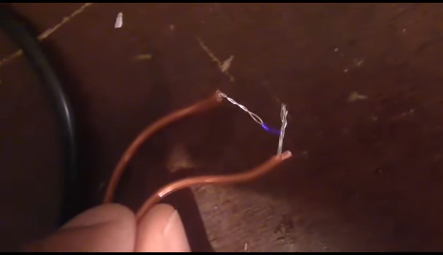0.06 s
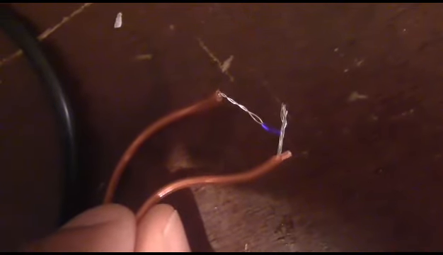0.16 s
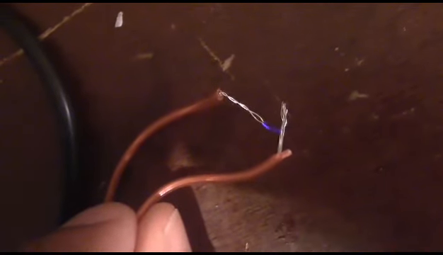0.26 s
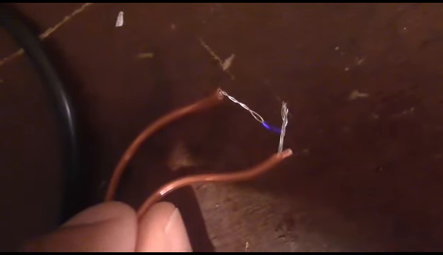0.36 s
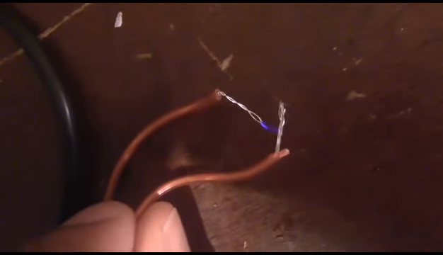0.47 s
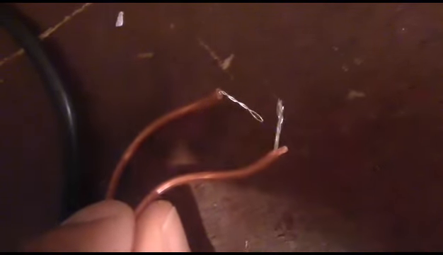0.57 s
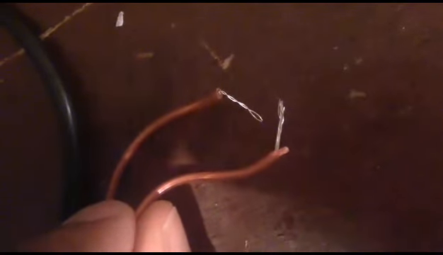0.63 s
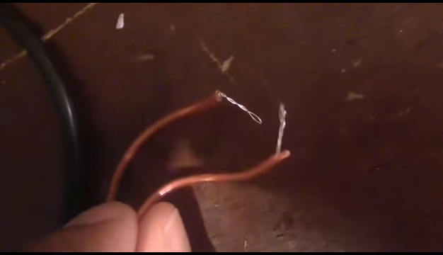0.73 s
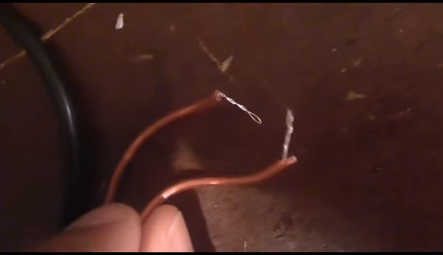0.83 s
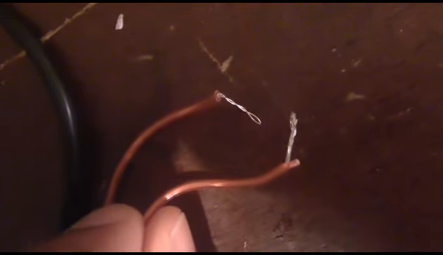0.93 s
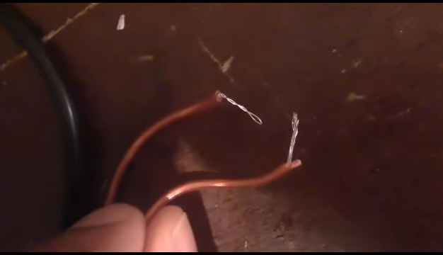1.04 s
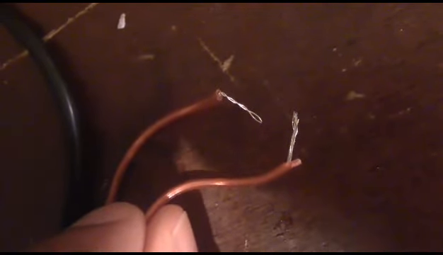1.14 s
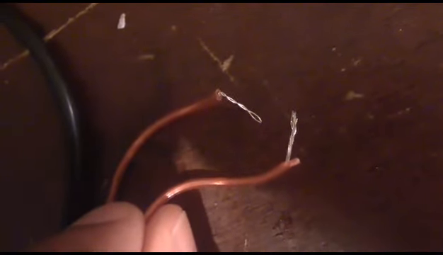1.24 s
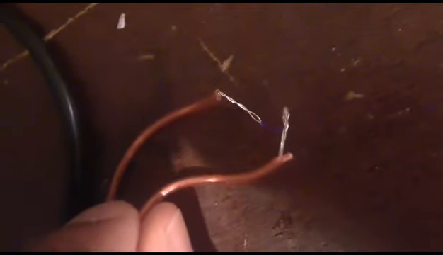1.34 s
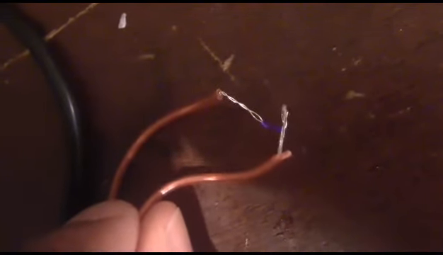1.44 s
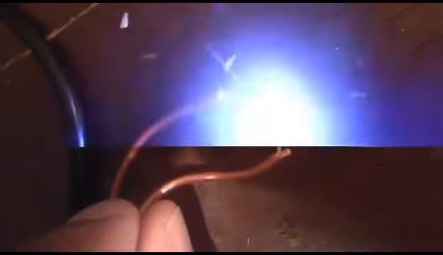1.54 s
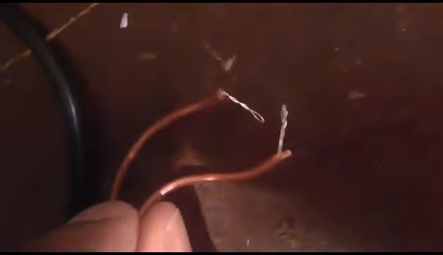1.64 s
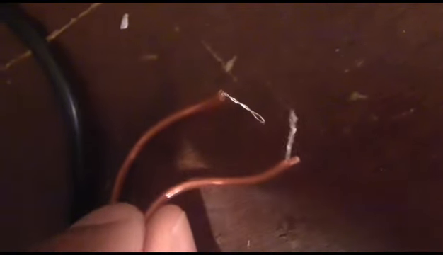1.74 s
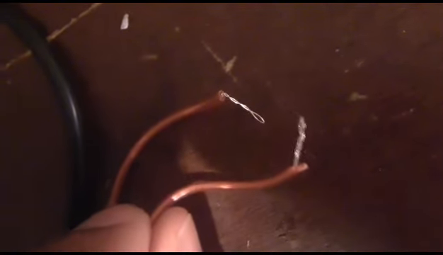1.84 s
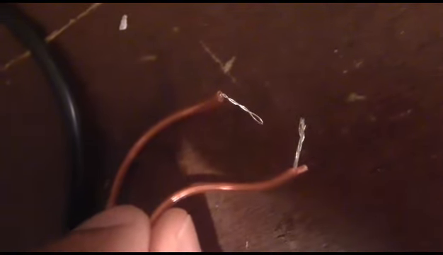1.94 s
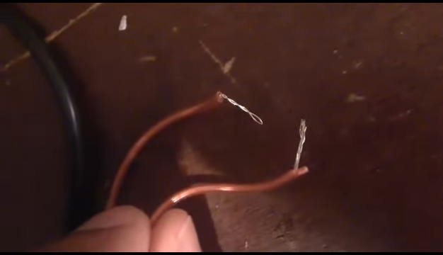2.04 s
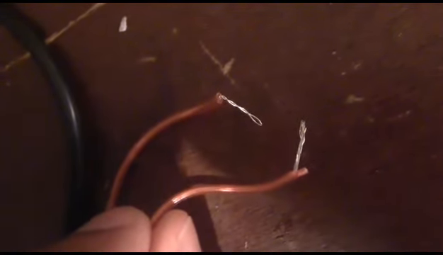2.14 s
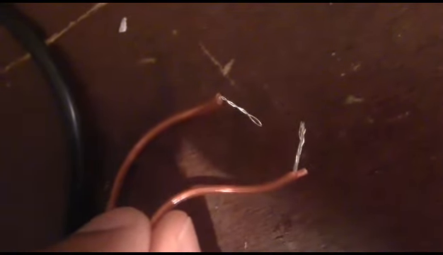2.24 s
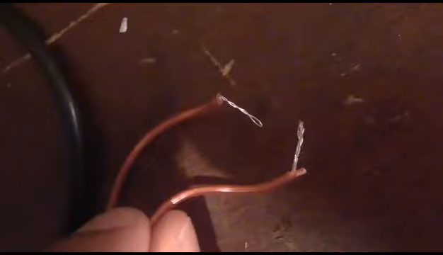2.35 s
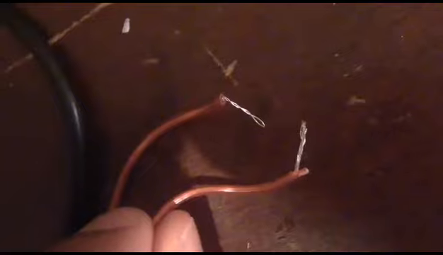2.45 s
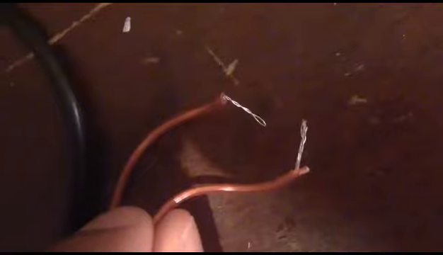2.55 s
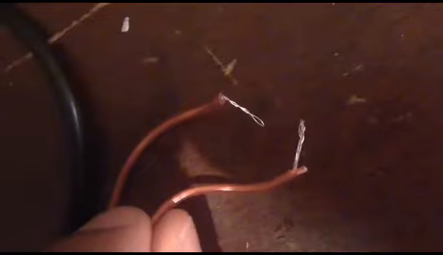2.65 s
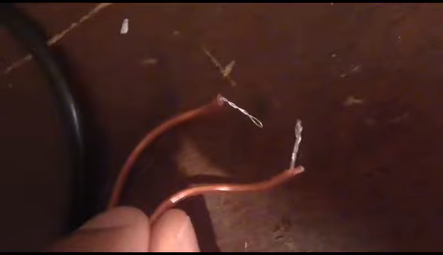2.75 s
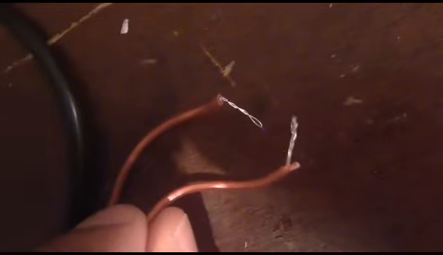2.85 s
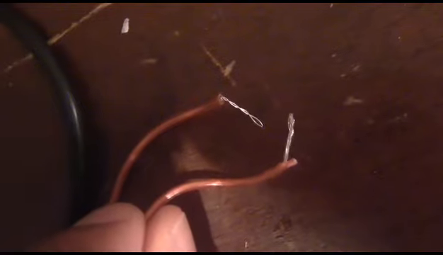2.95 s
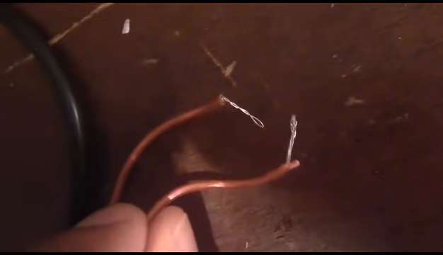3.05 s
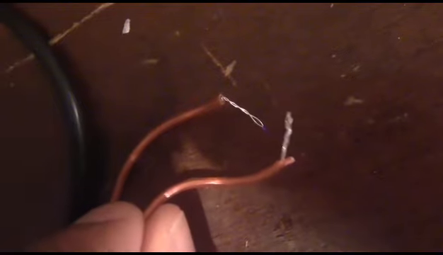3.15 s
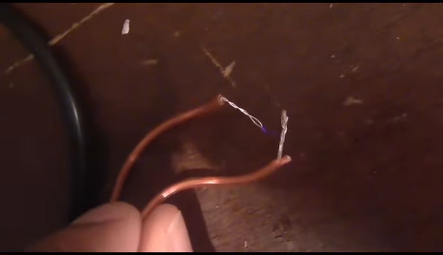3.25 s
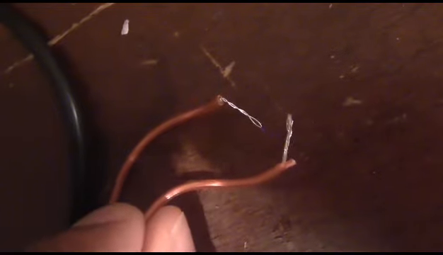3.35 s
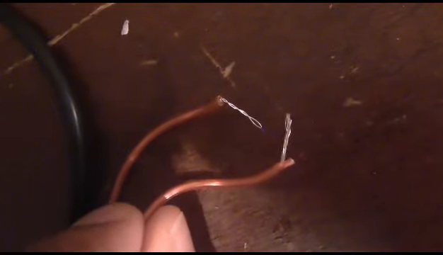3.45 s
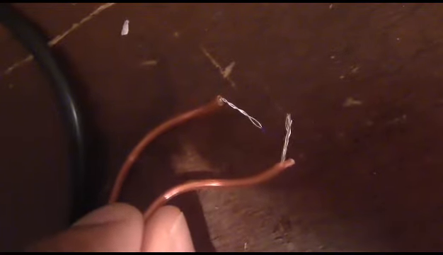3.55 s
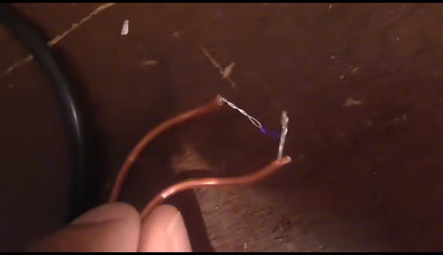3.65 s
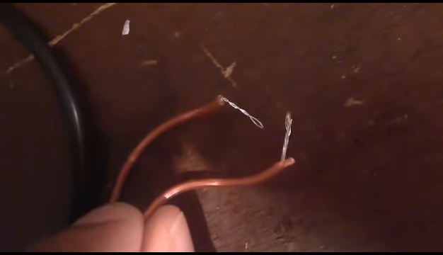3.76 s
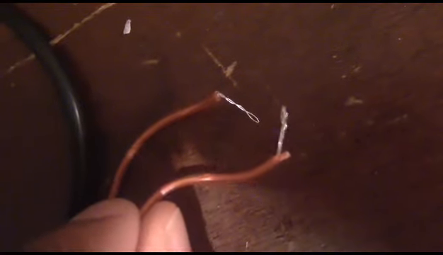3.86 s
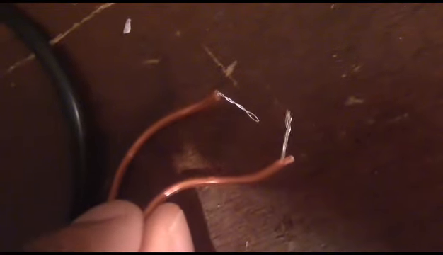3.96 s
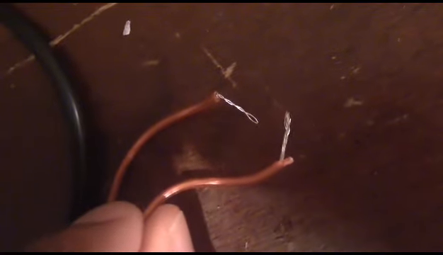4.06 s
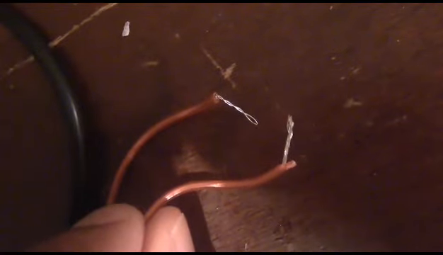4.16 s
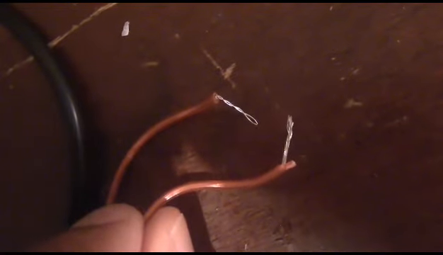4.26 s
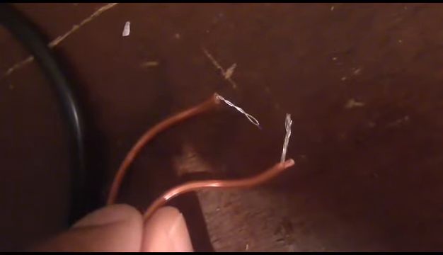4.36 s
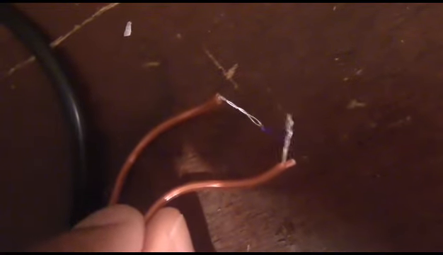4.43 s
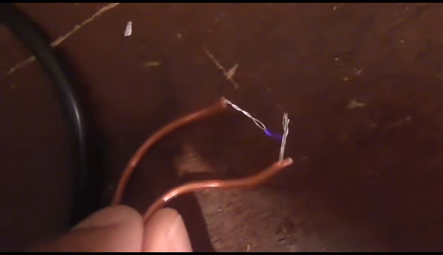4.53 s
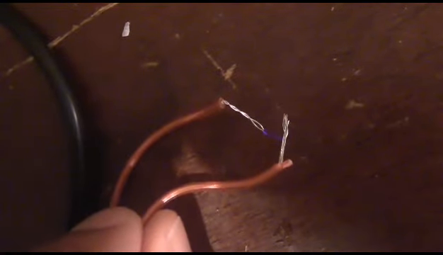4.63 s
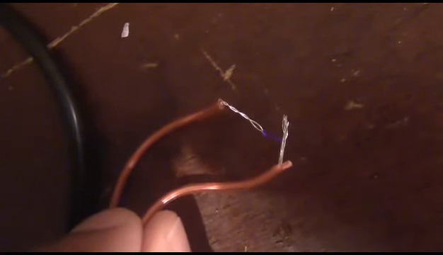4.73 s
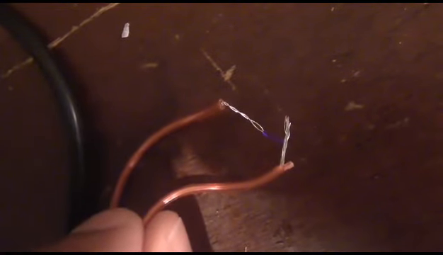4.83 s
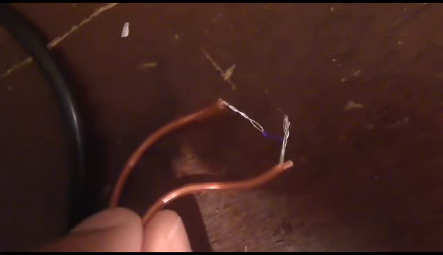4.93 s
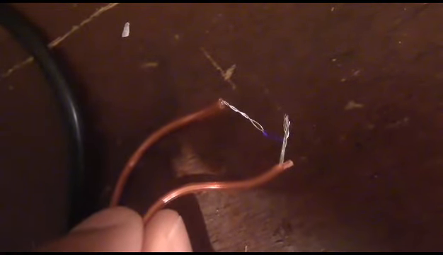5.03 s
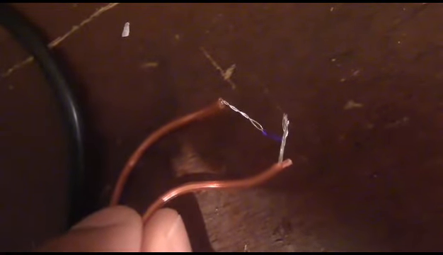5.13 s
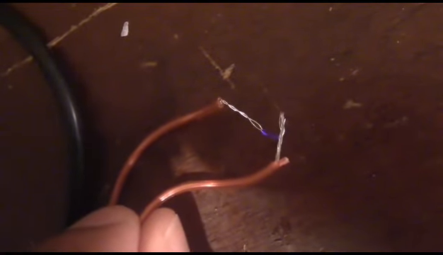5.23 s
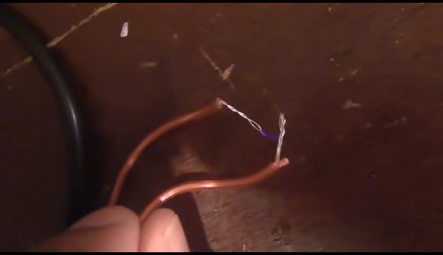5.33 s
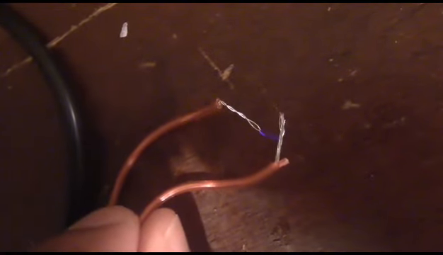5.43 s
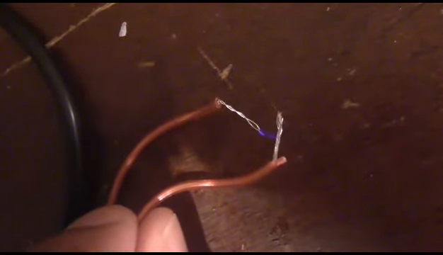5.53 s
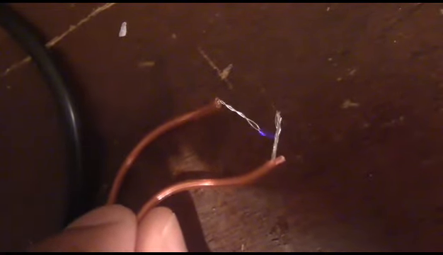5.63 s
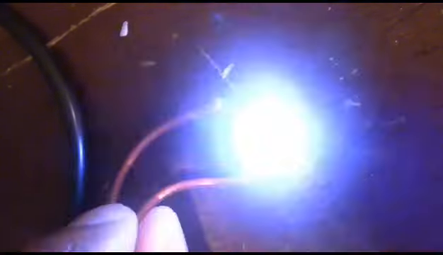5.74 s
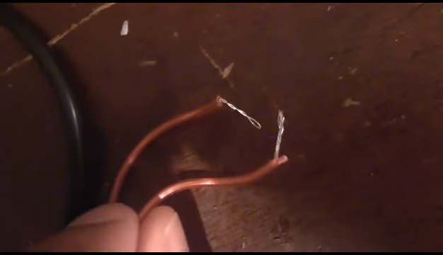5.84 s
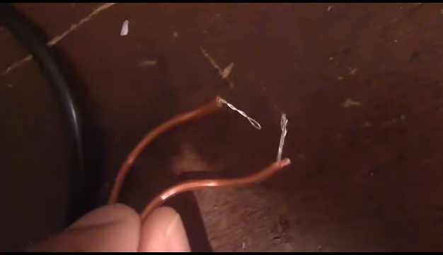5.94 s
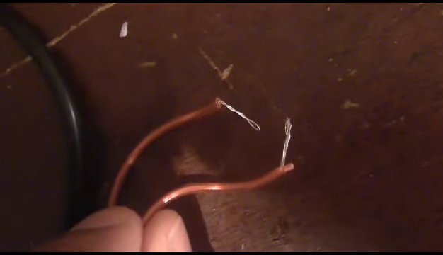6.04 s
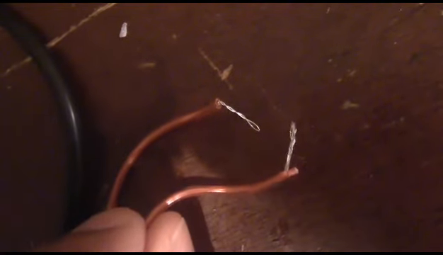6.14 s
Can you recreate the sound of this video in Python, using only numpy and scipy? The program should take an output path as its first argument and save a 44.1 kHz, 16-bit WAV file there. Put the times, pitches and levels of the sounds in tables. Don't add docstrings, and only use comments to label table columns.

```python
import sys
import numpy as np
from scipy import signal
from scipy.fft import rfft, irfft
from scipy.io import wavfile
from scipy.ndimage import uniform_filter1d

SR = 44100
rng = np.random.default_rng(int(sys.argv[2]) if len(sys.argv) > 2 else 0)


def store_wav(level_fs):
    pcm = np.round(np.clip(np.atleast_2d(level_fs), -1, 1) * 32767)
    wavfile.write(sys.argv[1], SR, pcm.T.astype(np.int16))


def attenuation_scalar(level_db):
    decades = np.asarray(level_db, float) / 20
    return 10 ** decades


N = 272979
ROOM_T60_S = 0.27


def rms_one(x):
    return x / np.sqrt(np.mean(x ** 2) + 1e-20)


def in_time(rows, outside=None):
    s, *columns = np.transpose(rows)
    t = np.arange(N) / SR
    return [np.interp(t, s, column, left=outside, right=outside) for column in columns]


def filtered(x, hz, kind, order=2):
    return signal.sosfilt(signal.butter(order, hz, kind, fs=SR, output="sos"), x)


def colour(x, spectrum):
    hz, level_db = np.transpose(spectrum)
    grid = np.maximum(np.arange(2049) * SR / 4096, 1)
    log_gain = np.interp(np.log(grid), np.log(hz), level_db) * np.log(10) / 20
    cepstrum = irfft(log_gain)
    cepstrum[1:2048] *= 2
    cepstrum[2049:] = 0
    kernel = irfft(np.exp(rfft(cepstrum)))[:2048]
    return signal.oaconvolve(x, kernel / np.sqrt(np.sum(kernel ** 2)))[:len(x)]


def drift(rate_hz):
    r = np.exp(-2 * np.pi * rate_hz / SR)
    settle = 20000
    noise = rng.standard_normal(N + settle)
    return rms_one(signal.lfilter([1], [1, -2 * r, r * r], noise)[settle:])


# t/s, f/Hz, level/dB
WHINE = [(0, 9850, -53), (.7, 9880, -48.5), (.8, 9804, -62), (1.2, 9770, -67), (1.45, 9790, -63),
         (1.7, 9803, -72), (1.8, 9854, -76), (1.93, 9860, -73.5), (2.1, 9720, -71.5), (2.4, 9760, -66),
         (3.8, 9770, -68), (4.05, 9810, -67.5), (4.3, 9770, -67), (5.9, 9850, -63), (6.05, 9730, -68),
         (6.19, 9780, -67.5)]


def oscillator():
    hz, level_db = in_time(WHINE)
    turns = np.cumsum(hz + 25.0 * drift(21) + 45.0 * drift(300)) / SR
    whine = attenuation_scalar(level_db + 1.2 * drift(40)) * np.sqrt(2) * np.sin(2 * np.pi * turns)
    return turns, whine


# t/s, level/dB, share of time lit [0-1], share of cycles that fire [0-1]
ARC = [
    [(0.0, -39.5, 1, 0.33), (0.654, -39, 1, 0.37), (0.705, -35.5, 0.8, 0.5)],
    [(1.495, -49, 0.8, 0.1), (1.535, -43, 0.7, .2), (1.579, -43, 0.8, 0.14), (1.597, -48.5, 0.56, 0.09),
     (1.623, -39, 0.94, 0.18), (1.695, -44.5, 0.94, 0.24), (1.737, -37.5, 1, 0.4)],
    [(4.657, -40, 0.85, 0.35), (4.831, -44.5, 0.86, 0.18), (5.249, -44, 0.96, 0.31),
     (5.397, -41.5, 0.99, 0.28), (5.501, -44, 0.86, 0.32), (5.555, -41.5, 0.96, 0.23),
     (5.643, -43.5, 0.91, 0.23), (5.845, -40, 0.94, 0.25), (5.918, -41.5, 0.84, 0.36)],
]


def steady_arc(luck, flicker, eager):
    clicks = np.zeros(N)
    for rows in ARC:
        last_s, *last = rows[-1]
        held = rows + [(last_s + .0105, *last)]
        level_db, lit, fire = in_time(held, outside=1e-9)
        fire, lit = np.clip(fire, 1e-9, 1), np.clip(lit, 1e-9, 1)
        fires = (flicker < lit) * (luck < fire * eager)
        clicks += fires * attenuation_scalar(level_db + 6.0) / np.sqrt(fire * lit)
    return clicks


# f/Hz, density/dB per Hz
SPARK = [(300, -24.5), (1050, -14), (1500, -15), (2200, -12), (3900, -6), (5100, -10.5), (6000, -5.5),
         (6500, -9), (7200, -7), (9700, -3), (11700, -1.5), (14200, -11.5), (14900, -22.5), (15700, -21),
         (15850, -66)]


def sparks(turns):
    cycle = np.diff(np.floor(turns), prepend=0) > 0
    luck, size = rng.random(N), attenuation_scalar(1.0 * rng.standard_normal(N))
    flicker = np.argsort(np.argsort(drift(330) + 0.35 * drift(52))) / N
    eager = attenuation_scalar(3.0 * drift(500))
    caught, weak = bursts(cycle, luck, flicker, eager)
    fired = (steady_arc(luck, flicker, eager) + caught) * cycle * size

    lag = 8 + 0.51 * rng.standard_normal(N) + 1.6 * drift(350)
    at = np.arange(N) + np.abs(np.rint(lag)).astype(int)
    clicks = np.bincount(at, fired)[:N]
    clicks += np.bincount(at + 2, fired * weak)[:N]
    direct = filtered(colour(clicks, SPARK), 180, "high")

    t = np.arange(SR // 4) / SR
    walls = rng.standard_normal(len(t)) * attenuation_scalar(-54.5 - 60 * t / ROOM_T60_S) * (t > .0015)
    table_and_hand = rng.standard_normal(len(t)) * attenuation_scalar(-30.0 - 60 * t / 0.01) * (t > .0002)
    return direct + signal.oaconvolve(direct, walls + table_and_hand)[:N]


# t/s, level/dB
GAIN = [(0, -65), (.71, -60.5), (1.4, -65), (1.72, -82.5), (1.93, -82.5), (2.17, -74), (3.24, -72),
        (4.19, -69.5), (5.34, -68.5), (5.9, -65.5), (6.19, -66)]
# f/Hz, density/dB per Hz
FLOOR = [(25, -50.5), (60, -29), (170, -13.5), (310, -3), (450, -6), (800, -10), (1500, -13), (4000, -40.5)]
# f/Hz, density/dB per Hz
HISS = [(200, -10.5), (800, -3), (2000, 1), (4500, 1), (6500, -5.5), (8000, -7), (10000, -5.5),
        (12000, -11.5), (14200, -15.5), (14900, -18), (15700, -22), (15850, -54.5)]


def background():
    gain_db, = in_time(GAIN)
    glow = sum(attenuation_scalar(in_time(rows, outside=-200)[0] - 18) for rows in ARC)
    glow = uniform_filter1d(glow, size=1500)
    knee_db, follows = -71, 0.54
    hiss = attenuation_scalar(-69.5 + follows * np.minimum(gain_db - knee_db, 0))
    out = attenuation_scalar(gain_db) * colour(rng.standard_normal(N), FLOOR)
    out += hiss * colour(rng.standard_normal(N), HISS)
    return out + glow * colour(rng.standard_normal(N), SPARK)


# t/s, level/dB
RUMBLE = [(0, -68), (1.3, -67.5), (1.5, -95), (4.5, -90.5), (6.19, -76.5)]


def hand_rumble():
    low = rms_one(filtered(rng.standard_normal(N), [110, 500], "band"))
    return low * attenuation_scalar(in_time(RUMBLE)[0] + 2.0 * drift(8))


# f/Hz, level/dB, t60/s
KNOCK = [(416, -27.5, 0.022), (1340, -28, 0.024), (1564, -7, 0.0055), (2730, -17.5, 0.0054),
         (4200, -17.5, 0.0046)]


def table_knock():
    after = np.maximum(np.arange(N) / SR - .4128, 0)
    attack = 1 - np.exp(-after / 0.00094)
    return attack * sum(attenuation_scalar(db - 60 * after / t60) * np.sin(2 * np.pi * hz * after) for hz, db, t60 in KNOCK)


# f/Hz, density/dB per Hz
CRACK = [(710, -58), (1200, -16.5), (3320, -4.5), (3870, -3.5), (7740, -3), (9210, -2.5), (14200, -3.5),
         (16000, -7.5)]
# delay/ms, level/dB, smear/ms
ECHOES = [(2.28, -20.5, 1.2), (6.937, -17, 0.54), (8.12, -15, 1.7), (13.51, -7, .16), (13.53, -18.5, 0.552),
          (18.4, -16, 1), (22.2, -18, 0.36), (29.9, -21.5, 0.907), (60.8, -19, 1.32)]
# f/Hz, density/dB per Hz
TAIL = [(180, -58), (300, -27.5), (555, -13), (915, -11), (1170, -4), (1460, -10.5), (1780, -6), (4520, -6),
        (7570, -3), (12700, -5.5), (16000, -15)]


def snap_room(t):
    room = colour(rng.standard_normal(len(t)), TAIL) * attenuation_scalar(-16.5 - 60 * t / ROOM_T60_S) * (t > .004)
    treble = filtered(room, 9000, "high")
    room -= treble * (1 - attenuation_scalar(-60 * t / .5))
    room *= attenuation_scalar(-19 * np.exp(-(t / 0.029) ** 2.63))
    grain = rng.standard_normal(len(t))
    echoes = np.zeros(len(t))
    for ms, db, smear_ms in ECHOES:
        echoes += attenuation_scalar(db) * grain * (t > ms / 1000) * np.exp(-np.abs(t * 1000 - ms) / smear_ms)
    return room + colour(echoes, CRACK)


def input_swing(t, suction, suction_ms, push, push_ms, recovery_hz):
    ms, w = t * 1000, 2 * np.pi * recovery_hz
    step = push * ((ms > suction_ms) & (ms < suction_ms + push_ms)) - suction * (ms < suction_ms)
    step = signal.lfilter(*signal.butter(1, 300, fs=SR), step)
    return signal.lfilter(*signal.bilinear([1, 0, 0], [1, w / .84, w * w], SR), step)


# t/s, crack length/ms, crack level/dB, room level/dB
SNAPS = [
    (0.7164, 1.02, -9.5, 0),
    (1.7473, 3.26, -6.5, -4),
    (5.9285, 0.76, 2.5, -1.5),
]
# suction, suction length/ms, push, push length/ms, recovery f/Hz
SWINGS = [
    (.7, .65, .78, 1.85, 92),
    (.1, .74, .36, 1.05, 170),
    (.46, .83, .92, 1.52, 119),
]


def snaps():
    t = np.arange(SR // 2) / SR
    room = snap_room(t)
    out = np.zeros(N + len(t))
    for (s, ms, crack_db, room_db), shift in zip(SNAPS, SWINGS):
        start = round(s * SR)
        burning = np.exp(-(t * 1000 / ms) ** 4)
        crack = colour(rng.standard_normal(len(t)) * burning, CRACK)
        sound = attenuation_scalar(crack_db) * crack + attenuation_scalar(room_db) * room + input_swing(t, *shift)
        out[start:start + len(t)] += sound
    return out[:N]


# t/s, length/ms, level/dB
BURSTS = [(0.867, 15.6, -44), (0.967, 2.7, -49), (1.0125, 1.6, -41), (1.2628, 13, -54),
          (1.4127, 5.2, -51.5), (1.4626, 5.2, -55.5), (2.7147, 6.3, -50), (2.8295, 6.1, -51.5),
          (3.099, 4.3, -47.5), (3.346, 11, -43.5), (3.3646, 13.7, -41.5), (3.399, 15, -42.5),
          (3.44, 6.7, -43.5), (3.4502, 10, -41.5), (3.4637, 18, -44.5), (3.63, 8.6, -49.5),
          (3.669, 2.8, -46), (3.685, 4.9, -52), (3.7163, 4.9, -46), (3.7629, 4.9, -50), (3.781, 2.6, -47),
          (3.8356, 2.55, -43), (3.8153, 6.2, -43.5), (3.8425, 7.6, -42.5), (3.8535, 48.5, -41),
          (3.907, 11, -45.5), (3.9617, 8.4, -50), (3.9991, 30.4, -40), (4.4487, 5, -51.5),
          (4.637, 19.4, -40.5)]


def bursts(cycle, luck, flicker, eager):
    clicks, weak = np.zeros((2, N))
    for s, ms, level_db in BURSTS + ticks() + sputters():
        lit_s = max(ms - .55, .14) / 1000
        span = slice(round(s * SR), round((s + lit_s) * SR))
        share = np.clip(.3 + .05 * ms, 0, .7)
        steady = (flicker[span] < .85) | (ms < 5) | (ms > 20)
        fires = (luck[span] < share * eager[span]) & steady
        fires[np.argmax(cycle[span])] = True
        count = np.sum(fires & cycle[span]).clip(1)
        clicks[span] += fires * attenuation_scalar(level_db) * np.sqrt((ms + 0.87) * SR / 1000 / count)
        weak[span] = 0.38 * np.clip(-48.5 - level_db, 0, 1)
    return clicks, weak


TICK_DB = -52.5
# t/s, level/dB
TICKS = [(2.207, -59.5), (2.2582, -61), (2.281, -58), (2.3382, -51), (2.3872, -56), (2.4136, -53),
         (2.4286, -55), (2.451, -53.5), (2.483, -56), (2.518, -54), (2.5532, -55), (2.601, -56),
         (2.641, -55), (2.6582, -51.5), (2.765, -52.5), (2.8797, -52.5), (2.917, -57.5),
         (2.9647, -55), (2.99, -51), (3.0267, -52.5), (3.0512, -51), (3.0732, -53), (3.131, -47.5),
         (3.1582, -48), (3.1822, -47.5), (3.2067, -50), (3.241, -53), (3.2769, -50), (3.2862, -51),
         (3.3154, -48.5),
         (.887, -44), (.906, -39), (.9198, -42), (.932, -44), (.9409, -40), (.963, -49), (.9815, -52),
               (1.053, -50), (1.0624, -48.5), (1.4754, -47.5), (1.098, -49), (1.1278, -51), (1.148, -48.5),
               (1.1813, -54), (1.2166, -51.5), (3.5474, -47.5), (3.5538, -49), (3.5848, -46.5),
               (4.1713, -52.5), (4.1911, -52), (4.2219, -53), (4.251, -54), (4.277, -55.5), (4.3312, -52),
               (4.4009, -51), (4.5094, -51), (4.5198, -50), (4.5585, -47), (4.5957, -55), (4.6252, -50)]


def ticks():
    rows = []
    for s, db in TICKS:
        ms = 1.2 * attenuation_scalar(-0.2 * (db - TICK_DB))
        rows.append((s, min(ms, 2.2), db))
    return rows


# start t/s, end t/s, sputters per s, level/dB
SPELLS = [(.897, .97, 47.3, -42.5), (1.09, 1.22, 35, -54), (1.23, 1.33, 240, -53.5),
          (1.338, 1.378, 220, -56), (1.388, 1.45, 260, -54), (2.572, 2.94, 22, -57.5),
          (3.38, 3.398, 110, -47), (3.3392, 3.34, 50, -53), (3.422, 3.43, 226, -44.5),
          (3.487, 3.525, 166, -46.5), (3.607, 3.712, 192, -49.5), (3.756, 3.815, 69, -50),
          (3.92, 3.944, 200, -46.5), (3.951, 3.99, 76, -48), (4.033, 4.13, 107, -55.5),
          (4.205, 4.57, 32, -55), (1.466, 1.488, 220, -52.5), (6.108, 6.174, 88, -52.5)]


def sputters():
    rows = []
    for start, end, rate, db in SPELLS:
        gap, length, size = rng.random((3, 50))
        s = start + np.cumsum(np.append(0, 0.43 + 1.2 * gap[1:])) / rate
        mean_ms = 0.8 * attenuation_scalar(1.2 * (db - TICK_DB)).clip(0, 1.3)
        ms = .3 - mean_ms * np.log(1 - length)
        level_db = db + 2 * np.sqrt(12) * (size - .5)
        rows += [row for row in zip(s, ms, level_db) if row[0] < end]
    return rows


# t/s, decay/s, level/dB
RUSTLES = [
    (1.34, 0.06, -61.5),
    (2.346, 0.035, -59),
    (4.346, 0.035, -60),
]


def wire_slips():
    t = np.arange(N) / SR
    friction = rms_one(filtered(rng.standard_normal(N), [3700, 5900], "band")) * attenuation_scalar(2 * drift(100))
    level = np.zeros(N)
    for s, decay_s, db in RUSTLES:
        level += attenuation_scalar(db) * np.clip((t - s) / 0.0067, 0, 1) * np.exp(-np.abs(t - s) / decay_s)
    return level * friction


def scene():
    turns, whine = oscillator()
    generator = whine + sparks(turns) + snaps()
    hand = hand_rumble() + table_knock() + wire_slips()
    return np.tile(generator + hand + background(), (2, 1))


def top_cut(x):
    return signal.sosfilt(signal.butter(12, 17320, fs=SR, output="sos"), x)


def record(dry):
    overloaded = np.clip(dry, -.53, .53)
    band_limit = signal.cheby2(10, 60, 16800, fs=SR, output="sos")
    finished = signal.sosfilt(band_limit, overloaded)
    return top_cut(finished)


dry = scene()
out = record(dry)
store_wav(out)
```